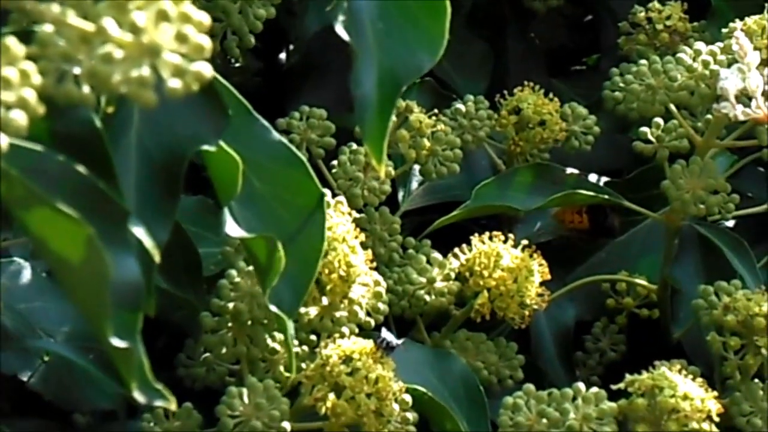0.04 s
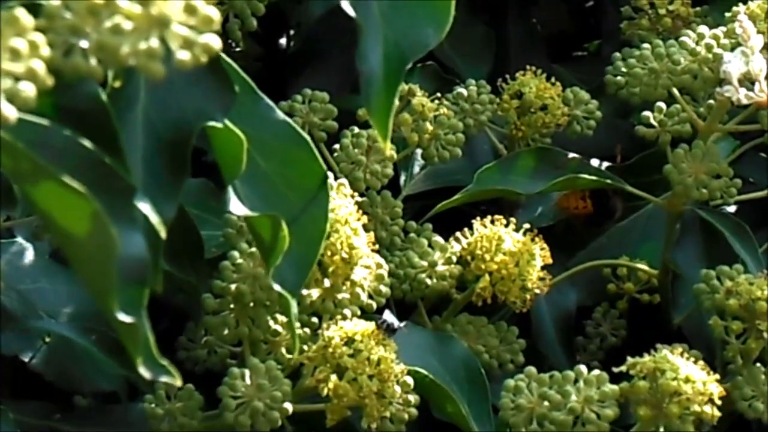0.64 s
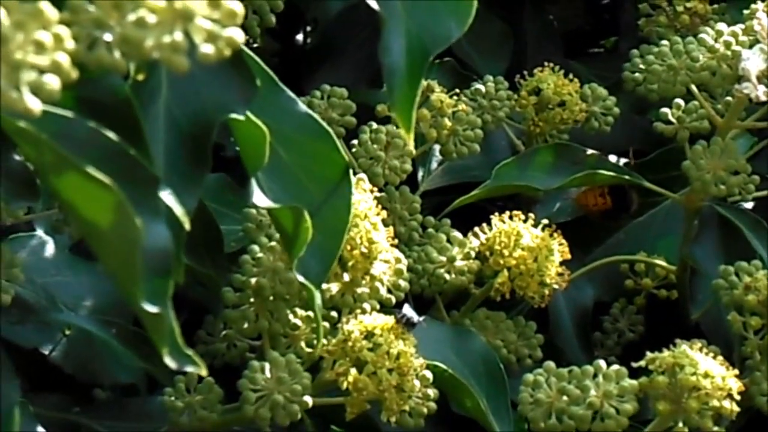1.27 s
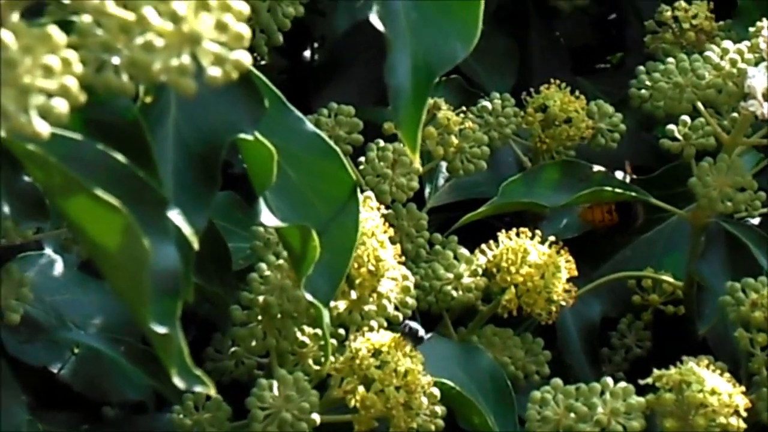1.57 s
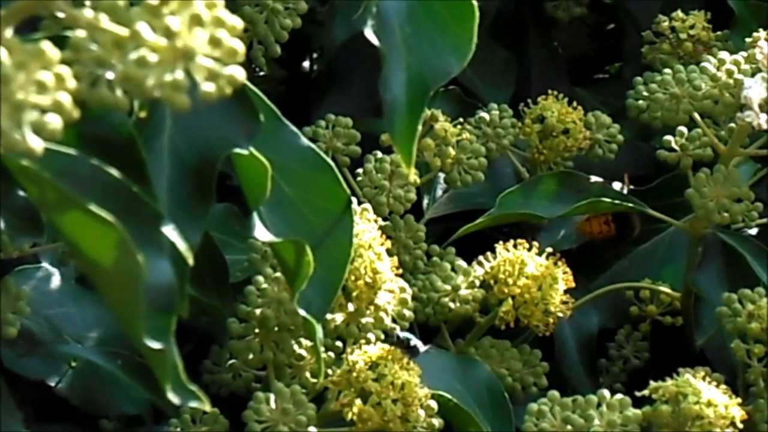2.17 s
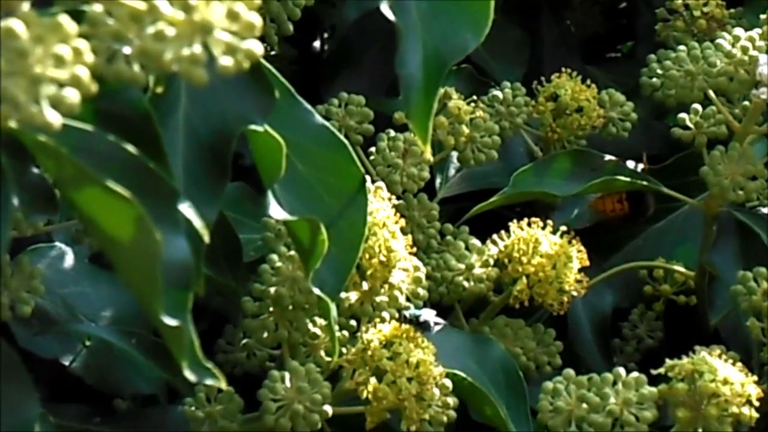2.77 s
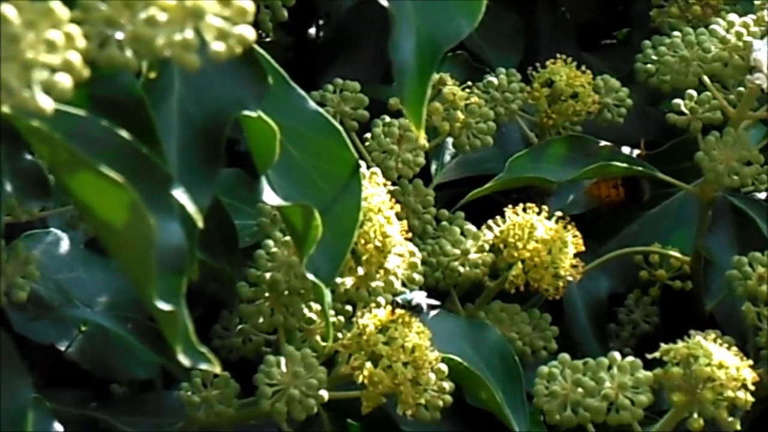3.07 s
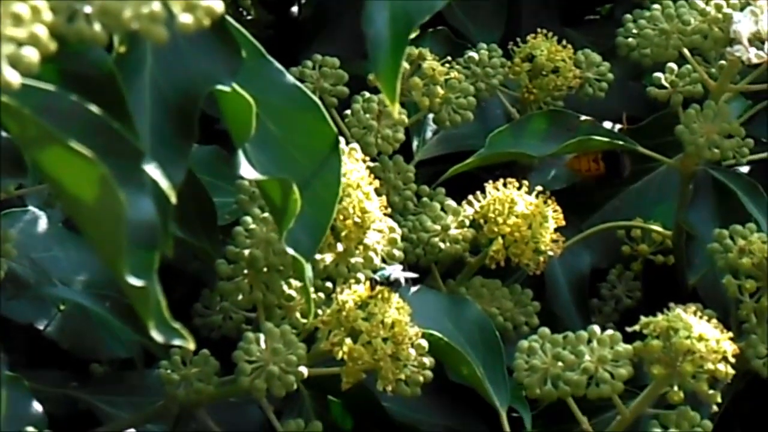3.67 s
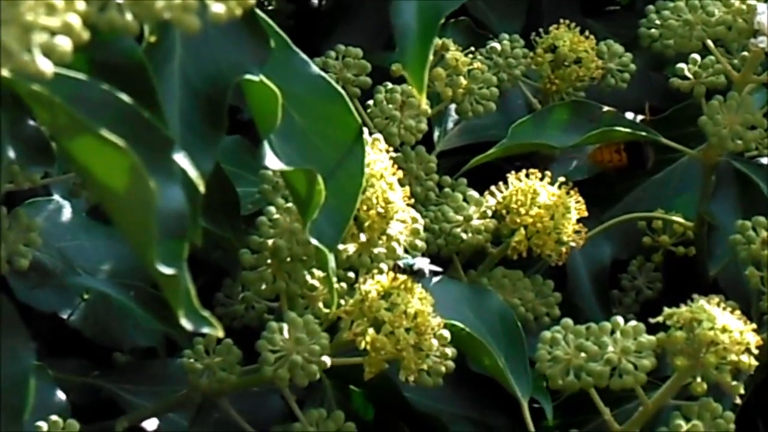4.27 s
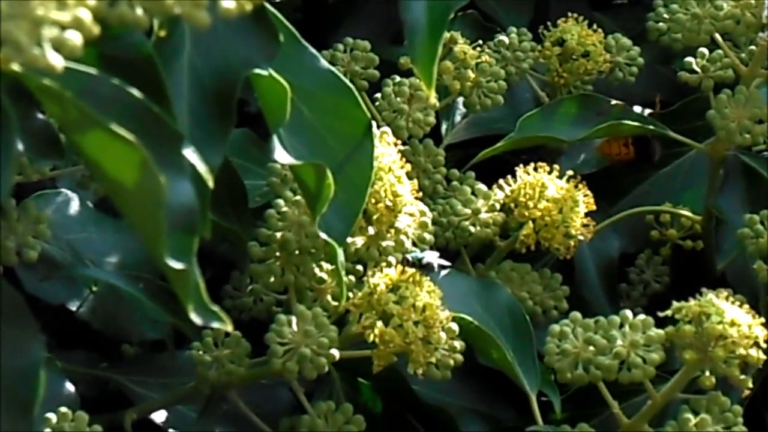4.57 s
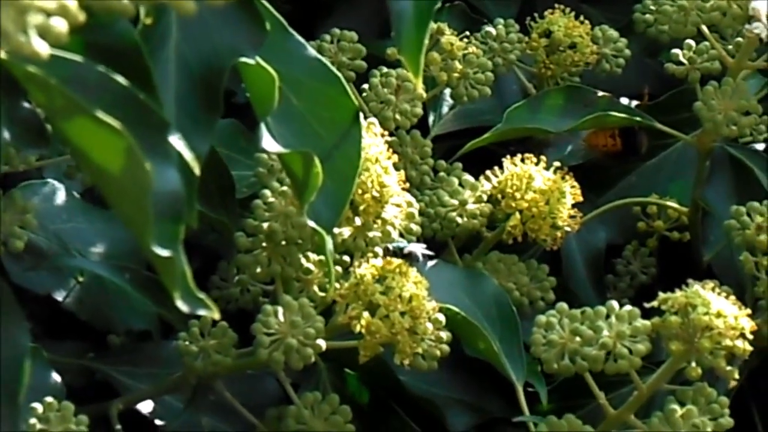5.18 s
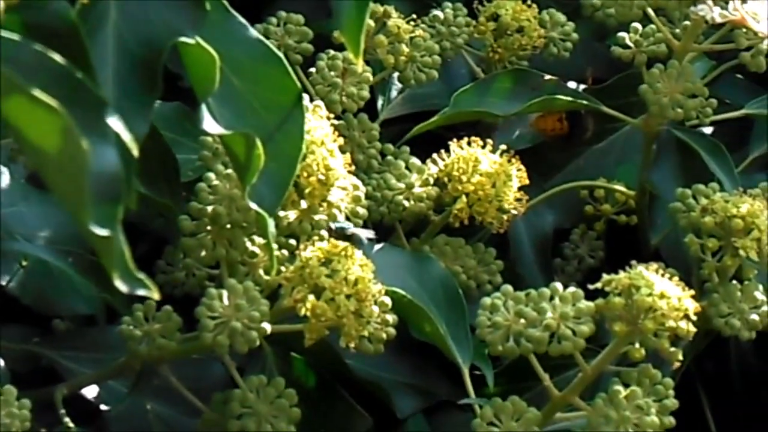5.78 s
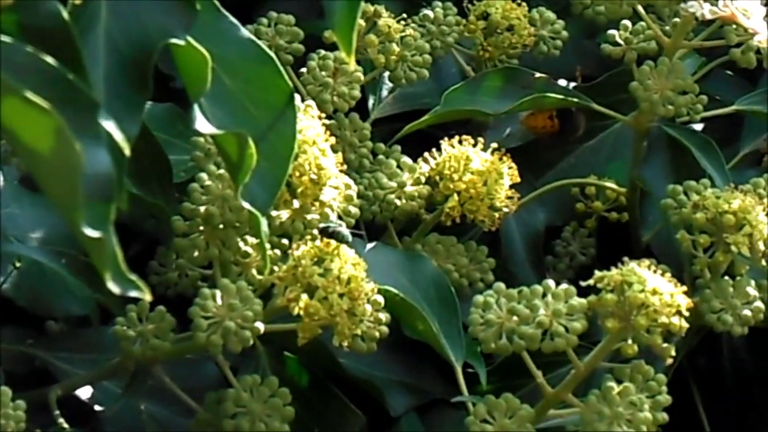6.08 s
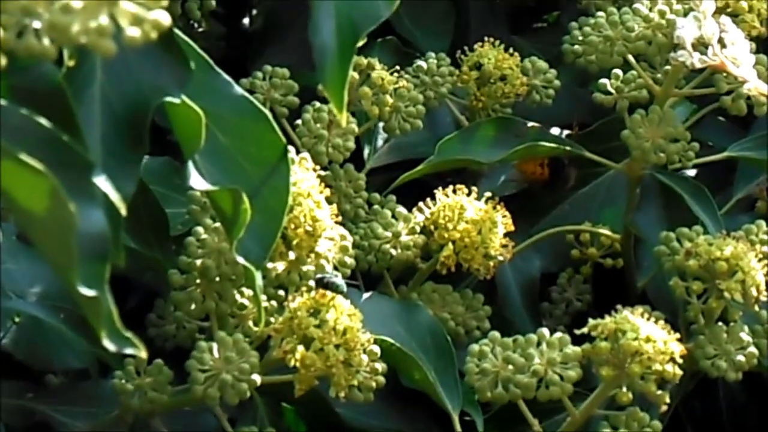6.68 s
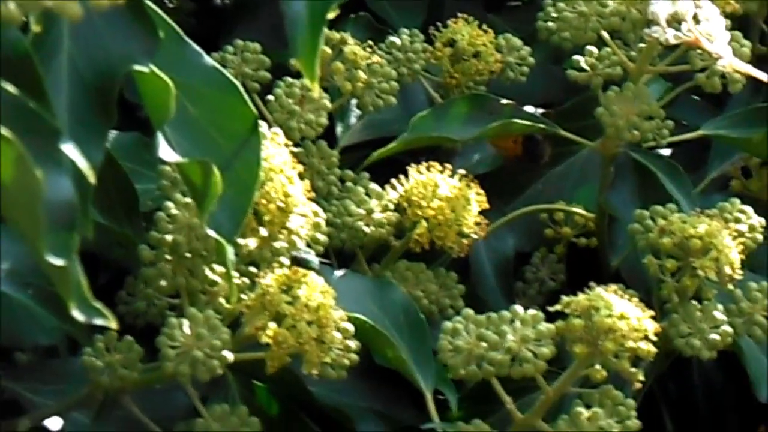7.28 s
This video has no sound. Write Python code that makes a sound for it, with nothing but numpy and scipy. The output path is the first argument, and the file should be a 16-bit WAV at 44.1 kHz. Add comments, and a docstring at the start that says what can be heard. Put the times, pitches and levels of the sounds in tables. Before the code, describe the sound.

A cicada-like insect rasps in fast, even chirps close by, over a throbbing insect chorus and faint wind on the microphone.

```python
"""Insects on a sunny ivy bank

Close to the microphone a cicada-like singer rasps about nine chirps a second, each a burst of tymbal
clicks scattered by the leaves. Further off a chorus throbs a little faster, in and out of step with it.
Bees hum faintly at the flowers, and a breeze buffets the hand-held microphone in the first seconds."""
import sys
import numpy as np
from scipy import signal
from scipy.fft import rfft, irfft
from scipy.io import wavfile
from scipy.ndimage import map_coordinates

SR = 44100
rng = np.random.default_rng(int(sys.argv[2]) if len(sys.argv) > 2 else 0)


def wrap_up_sound(samples):
    """Save the sound to the file named by the first command line argument, as 16-bit audio."""
    columns = np.atleast_2d(samples).T
    # keep every value between -1 and 1, then stretch to whole-number steps
    tamed = np.clip(columns, -1, 1)
    steps = np.round(tamed * 32767).astype(np.int16)
    wavfile.write(sys.argv[1], SR, steps)


N = 328103
TIME = np.arange(N) / SR
FREQ = np.maximum(np.arange(N // 2 + 1) * SR / N, 1)

# Narrow resonances of the song, near and far. Each row: centre in Hz, width in Hz, lift in dB.
SONG_RESONANCES = [(2210, 97, 4.5), (2520, 32, 3.5), (2708, 29, 5.5), (2925, 40, 4), (3946, 65, 5.5),
                   (4635, 67, 4), (4865, 25, 7.5), (5300, 33, 7), (5488, 23, 7), (5880, 110, 4.5)]


def near_singer():
    """Close by, each chirp is a burst of clicks that rings the abdomen and, higher up, the ribs."""
    # The singer drags and hurries. Each row: time in seconds, lag in seconds, effort in dB, rib bias in dB.
    delivery = [(0.0, 0.068, -35, -11), (0.45, 0.03, -35, -10.5), (0.8, 0.015, -32, -9.5),
                (1.25, -0.007, -33.5, -7), (1.55, 0.015, -33, -5.5), (2.0, 0.07, -36.5, -5.5),
                (2.5, 0.031, -34, -10.5), (2.75, 0.057, -34.5, -10.5), (3.35, 0.005, -35, -2),
                (3.7, 0.0038, -36, -9), (4.0, 0.016, -32.5, -4), (4.65, -0.012, -36, -6.5),
                (5.25, -0.017, -36, -5), (6.15, 0.018, -37, -4.5), (6.55, 0.071, -31.5, -8),
                (6.78, 0.097, -49.5, -18), (7.0, 0.045, -38, -11), (7.44, 0.09, -39, -6)]
    # Chirps that stand out, falter or linger.
    # Each row: time in seconds, extra body in dB, extra ribs in dB, length factor.
    accents = [(.26, 1.5, 4.5, 0.8), (.35, 4, 2, 0.73), (.45, 0.5, 3.5, 0.69), (.66, -2.5, -1.5, 1.3),
               (1.18, 0, -1, 1.35), (1.4, 1.5, -1, 1.05), (1.76, 0.5, 3.5, 1.13), (1.87, 1, 2, 1.5),
               (2.39, 3, 1, 0.98), (2.72, 0.5, 4.5, 1.9), (2.83, 3, 4, 1.16), (3.15, 2, -2.5, 1.12),
               (3.24, 3, -4, 1.37), (3.33, 2, -0.5, 0.95), (3.43, 1, 0, 1), (3.97, -1.5, 0.5, 1.32),
               (4.07, 0, -2, 1.13), (4.17, -6, -5, 2.2), (4.29, -0.5, -5, 0.86), (4.39, 1.5, 0.5, 0.85),
               (4.59, 0.5, 2, 0.9), (4.7, 0.5, 3.5, 1), (4.81, 0, 3.5, 0.89), (5.12, -1, -4.5, 1.13),
               (5.34, 2, -1, 1.05), (5.68, -2.5, -0.5, 0.92), (6.49, -2.5, -0.5, 1.06), (6.6, 0, 6, 1.1)]
    # The drum-like abdomen and the stiff tymbal ribs. Each row: frequency in Hz, relative level in dB.
    body_spectrum = [(400, -27), (950, -21.5), (1400, -9), (1950, -8), (2300, -3), (2750, 0), (3100, -2),
                     (3550, -3.5), (3800, -11), (4300, -12), (5500, -43.5)]
    rib_spectrum = [(3000, -21), (4000, -11.5), (4700, 0.5), (5300, 4.5), (5700, 0.5), (6400, 4),
                    (6900, -1), (7600, -10.5), (8600, -9), (9300, -16.5), (10100, -14), (11000, -56)]
    body_chirp_s, rib_chirp_s = 0.044, 0.038
    body_trim_db, rib_trim_db = -0.03, 1.1
    body_scatter_db, rib_scatter_db = 0.3, 0.6

    times = beats(delivery, period_s=0.107)
    at, _, effort_db, rib_bias_db = np.transpose(delivery)
    body_db = np.interp(times, at, effort_db) + body_scatter_db * np.interp(times, TIME, drift(7.3))
    ribs_db = body_db + np.interp(times, at, rib_bias_db)
    stretch = np.ones(len(times))
    for t, extra_body_db, extra_ribs_db, length_factor in accents:
        nearest = np.argmin(np.abs(times - t))
        body_db[nearest] += extra_body_db
        ribs_db[nearest] += extra_ribs_db
        stretch[nearest] = length_factor

    clicks = tymbal(click_hz=649.9, jitter=0.2, scatter_db=1.3)
    muscle_phase = wavering_phase(hz=105, spread=0.1125, rate_hz=29.8)
    clicks *= 1 + 0.18 * np.sin(muscle_phase)  # muscle strokes group the clicks
    body = colour(leaves(clicks, smear_s=0.0027, direct_db=-5), body_spectrum, SONG_RESONANCES)
    ribs = colour(leaves(clicks, smear_s=0.0027, direct_db=-6), rib_spectrum, SONG_RESONANCES)
    body *= swells(times, body_chirp_s * stretch, body_db + body_trim_db, rise=5.8, fall=2.02)
    ribs *= swells(times, rib_chirp_s * stretch, ribs_db + rib_trim_db, rise=3.6, fall=1.66)
    return body + gain(rib_scatter_db * drift(30)) * ribs


def tymbal(click_hz, jitter, scatter_db):
    """Ribs buckle one after another: a train of unevenly spaced, unevenly strong clicks."""
    cycles = np.cumsum(click_hz * np.exp(jitter * drift(click_hz))) / SR
    clicks = np.diff(np.floor(cycles), prepend=0)
    return unit_rms(clicks * gain(scatter_db * noise()))


def leaves(clicks, smear_s, direct_db):
    """Countless leaves throw each click back as a short diffuse tail."""
    energy = signal.lfilter([1], [1, -np.exp(-1 / (smear_s * SR))], clicks ** 2)
    tails = unit_rms(np.sqrt(energy) * noise())
    return unit_rms(gain(direct_db) * clicks + tails)


def beats(delivery, period_s):
    """Times of a singer's chirps: a steady beat, shifted by the singer's lag."""
    at, lag_s = np.transpose(delivery)[:2]
    count = (TIME - np.interp(TIME, at, lag_s)) / period_s
    whole = np.arange(np.floor(count[0]), np.ceil(count[-1]) + 1)
    return whole * period_s + np.interp(whole, count, TIME - count * period_s)


def far_chorus():
    """Singers further off overlap into a rasp that throbs loosely at its own pace."""
    # Their own beat. Each row: time in seconds, lag in seconds, effort in dB.
    delivery = [(0.0, 0.091, -40), (0.4, 0.029, -35), (0.8, 0.024, -36), (1.2, 0.033, -35),
                (1.7, 0.042, -35), (2.05, 0.083, -42.5), (2.5, 0.031, -35.8), (3.0, 0.042, -39.5),
                (3.4, 0.013, -33.5), (3.8, 0.016, -36.5), (4.2, 0.00086, -34.5), (4.5, 0.019, -42.5),
                (4.9, 0.048, -34.5), (5.3, 0.0095, -41.5), (5.7, 0.0044, -35.5), (6.0, 0.03, -40.5),
                (6.4, 0.034, -37.5), (6.9, -0.0091, -36.5), (7.44, 0.017, -39)]
    # Their tone at a distance. Each row: frequency in Hz, relative level in dB.
    spectrum = [(400, -27.5), (950, -17.5), (1400, -8), (2000, -4.5), (2650, 0.5), (3000, -0.5), (3400, -7),
                (3900, -15.5), (4400, -15), (5300, -11), (6400, -13), (7500, -19), (10000, -25),
                (11000, -41)]
    throb_s, throb_db, floor_db = 0.048, -1.07, -5.5
    clicks = tymbal(click_hz=451.2, jitter=0.35, scatter_db=2)
    rasp = colour(leaves(clicks, smear_s=0.006, direct_db=-12.5), spectrum, SONG_RESONANCES)
    times = beats(delivery, period_s=0.09804)
    throbs = swells(times, [throb_s] * len(times), [throb_db] * len(times), rise=2.15, fall=1.63)
    at, _, effort_db = np.transpose(delivery)
    loudness = gain(np.interp(TIME, at, effort_db) + 0.99 * drift(25))
    return rasp * loudness * np.hypot(throbs, gain(floor_db))


def reflections(direct):
    """Hard surfaces nearby comb the sound; the teeth drift as the hand-held microphone sways."""
    # One echo per surface. Each row: delay in seconds, level against the direct sound in dB.
    echoes = [(.0043, -17.5), (.0097, -10.5), (0.0162, -16)]
    sway_s = 0.000401
    out = direct
    for delay_s, db in echoes:
        position = (TIME - delay_s - sway_s * drift(0.752)) * SR
        out = out + gain(db) * map_coordinates(direct, [position], order=3)
    return out * np.std(direct) / np.std(out)


def shifting_colour(song):
    """The song leans up or down with the abdomen's tension; its hollow and hissy edges wax and wane."""
    # The hollow lower edge and the hiss between body and ribs. Each row: time in seconds, lift in dB.
    hollow_lift = [(0, -1.6), (1.7, -2), (2.05, -4), (2.3, 0), (3.7, -3), (5.4, -1.5), (6.1, -0.2),
                   (6.7, -2), (7.4, 0)]
    hiss_lift = [(0, 1), (.27, 7), (.6, 1), (1.5, 2.5), (2, -2), (3.5, .5), (4, -1.5), (4.6, 3), (5.2, -3),
                 (7.4, 0.5)]
    # Tension of the abdomen. Each row: time in seconds, upward lean in dB.
    tension = [(0, -0.5), (1.85, 0), (2.1, 3), (2.3, -0.5), (2.8, 0.5), (3.3, 0.5), (4, 0.5), (4.9, -.3),
               (6.6, -0.2), (7.4, -1.5)]
    lows = irfft(rfft(song) / (1 + (FREQ / 1900) ** 10), N)
    hollow = lows * (gain(curve(hollow_lift)) - 1)
    hiss = band(song, hz=4500, width_hz=510) * (gain(curve(hiss_lift)) - 1)
    lean = gain(curve(tension) + 1.13 * drift(12))
    upper = band(song, hz=3100, width_hz=390) * (lean - 1)
    lower = band(song, hz=2160, width_hz=390) * (1 / lean - 1)
    return song + hollow + hiss + upper + lower


def sinking_strains():
    """Now and then a narrow, rough resonance stands out of the chorus and slides down."""
    # Each row: middle in seconds, length in seconds, pitch in Hz, glide in Hz per second, level in dB.
    strains = [(.49, 0.13, 2695, -400, -38), (2.661, 0.16, 2600, -100, -45), (4.3, 0.063, 2700, -2000, -43),
               (4.88, .19, 2593, -1700, -42.5)]
    roughness = drift(70) + 1j * drift(59)
    out = np.zeros(N)
    for t, length, hz, glide, db in strains:
        phase = 2 * np.pi * np.cumsum(hz + glide * (TIME - t)) / SR
        out += unit_rms((roughness * np.exp(1j * phase)).real) * swells([t], [length], [db])
    return out


def bees():
    """Bees flit between the flowers: a wavering wingbeat with its harmonics."""
    # Short flights. Each row: middle in seconds, length in seconds, wingbeat in Hz, level in dB.
    flights = [(4.95, .45, 239.3, -69), (6.524, 0.056, 164, -60), (6.75, 0.026, 161, -58.5)]
    # The wing's tone. Each row: harmonic number, relative level in dB.
    harmonics = [(1, 1), (2, -9), (3, -3), (4, -1), (5, -3), (6, -16)]
    out = np.zeros(N)
    for t, length, hz, db in flights:
        phase = wavering_phase(hz, spread=0.0323, rate_hz=39)
        buzz = sum(gain(harmonic_db) * np.sin(k * phase) for k, harmonic_db in harmonics)
        out += unit_rms(buzz) * swells([t], [length], [db])
    return out


def breeze():
    """Eddies rumble on the microphone and swell in gusts; the sharper ones push it for about a cycle."""
    # The steady breeze. Each row: time in seconds, level in dB.
    strength = [(0, -71), (.5, -64.5), (3.2, -65), (3.6, -69), (6.3, -72), (6.8, -70), (7.44, -65)]
    # Gusts. Each row: start in seconds, length in seconds, level in dB.
    gusts = [(0.112, 0.083, -57), (0.24, .07, -57), (0.365, .15, -55), (0.844, 0.18, -53.5),
             (1.138, 0.1, -52.5), (1.48, 0.04, -48), (1.64, 0.15, -52.5), (1.852, 0.081, -52),
             (2.58, 0.066, -56), (2.9, 0.096, -60), (3.03, .04, -59)]
    # The rumble. Each row: frequency in Hz, relative level in dB.
    spectrum = [(15, 5), (35, 7), (55, -4.5), (90, -2.5), (150, -44), (300, -22), (700, -68)]
    # Soft bumps of air. Each row: middle in seconds, length in seconds, frequency in Hz, level in dB.
    buffets = [(0.406, 0.0045, 118, -40.5), (0.474, 0.0059, 116, -47), (.507, .012, 80, -61),
               (1.188, 0.0052, 105, -46), (1.511, 0.023, 50, -52), (3.055, 0.016, 65, -54)]
    starts, lengths, gust_db = np.transpose(gusts)
    gusting = swells(starts + lengths / 2, lengths, gust_db, rise=4, fall=4.4)
    out = colour(noise(), spectrum) * np.hypot(gain(curve(strength)), gusting)
    for t, length, hz, db in buffets:
        out += unit_rms(np.sin(2 * np.pi * hz * (TIME - t))) * swells([t], [length], [db])
    return out


def stirrings():
    """Small sounds near the microphone: a tiny high tick, a soft hollow knock and a brief low rustle."""
    # The knock's modes. Each row: frequency in Hz, level in dB, seconds to fade by 60 dB.
    knock_modes = [(342, -59, 0.88), (426, -58, 0.26), (524, -61, 0.29)]
    # The tick and the rustle. Each row: middle in seconds, length in seconds, level in dB.
    ticks = [(3.094, 0.0025, -49)]
    rustles = [(6.553, 0.088, -54.5)]
    # The rustle's tone. Each row: frequency in Hz, relative level in dB.
    rustle_spectrum = [(50, -5), (110, -3), (200, -3), (400, -8), (750, -6), (1500, -14)]
    knock_start_s = 5.945
    age = np.maximum(TIME - knock_start_s, 0)
    knock = sum(gain(db - 60 * age / t60) * np.sin(2 * np.pi * hz * age) for hz, db, t60 in knock_modes)
    tick = unit_rms(band(noise(), hz=9800, width_hz=890)) * swells(*np.transpose(ticks))
    rustle = colour(noise(), rustle_spectrum) * swells(*np.transpose(rustles))
    return tick + knock + rustle


def garden_air():
    """Soft outdoor air all round the bank, with a few faint hums that waver in pitch and level."""
    # The hums. Each row: pitch in Hz, mean level in dB.
    hums = [(341, -79), (539, -73), (761, -89)]
    # The air. Each row: frequency in Hz, relative level in dB.
    spectrum = [(20, -3), (100, -0.5), (240, -5), (450, -2.5), (800, -0.5), (1500, -0.5), (4000, -9),
                (11000, -29.5)]
    air_db = -57.5
    out = np.zeros(N)
    for hz, db in hums:
        loudness = gain(db + 2 * drift(5.9))
        out += loudness * unit_rms(np.sin(wavering_phase(hz, spread=0.01805, rate_hz=19.6)))
    return out + colour(noise(), spectrum) * gain(air_db + 2.4 * drift(9.2))


def gain(db):
    """Decibels to amplitude."""
    return 10 ** (np.asarray(db) / 20)


def unit_rms(x):
    """Scale to rms 1."""
    return x / np.sqrt(np.mean(x ** 2))


def curve(rows):
    """Join rows of time in seconds and value by straight lines."""
    return np.interp(TIME, *np.transpose(rows))


def noise():
    """White noise."""
    return rng.standard_normal(N)


def drift(rate_hz):
    """Smooth random motion of rms 1 that changes about rate_hz times a second."""
    return unit_rms(irfft(rfft(noise()) * np.exp(-(FREQ / rate_hz) ** 2), N))


def wavering_phase(hz, spread, rate_hz):
    """Phase of a tone whose pitch wanders about hz by the fraction spread."""
    return 2 * np.pi * np.cumsum(hz * (1 + spread * drift(rate_hz))) / SR


def band(x, hz, width_hz):
    """The part of x in a bell-shaped band."""
    return irfft(rfft(x) * np.exp(-((FREQ - hz) / width_hz) ** 2), N)


def colour(x, spectrum, resonances=()):
    """Pass x through a broad spectrum with narrow resonances on top; rms 1."""
    hz, db = np.transpose(spectrum)
    gain_db = np.interp(np.log(FREQ), np.log(hz), db)
    for centre, width, lift in resonances:
        gain_db += lift / (1 + (2 * (FREQ - centre) / width) ** 2)
    skirts = 1 / (1 + (hz[0] / 2 / FREQ) ** 2) / (1 + (FREQ / hz[-1] / 2) ** 2)
    return unit_rms(irfft(rfft(x) * gain(gain_db) * skirts, N))


def swells(times, lengths, levels_db, rise=2, fall=2):
    """Envelope of rounded bursts, lengths taken at half power; a higher rise or fall squares that flank."""
    power = np.zeros(N)
    for t, length, db in zip(times, lengths, levels_db):
        near = slice(*np.searchsorted(TIME, [t - 2 * length, t + 2 * length]))
        offset = 2 * (TIME[near] - t) / length
        squareness = np.where(offset < 0, rise, fall)
        power[near] += gain(db) ** 2 * 0.5 ** (np.abs(offset) ** squareness)
    return np.sqrt(power)


def scene():
    """The whole bank at one microphone."""
    song = shifting_colour(reflections(near_singer() + far_chorus()))
    return (song + sinking_strains() + bees() + garden_air() + breeze() + stirrings())[None]


def record(dry):
    """A steep low-pass after the microphone cuts the top of the treble."""
    top_hz = 10700
    return signal.sosfilt(signal.ellip(8, 0.2, 70, top_hz, fs=SR, output="sos"), dry)


dry = scene()
out = record(dry)
wrap_up_sound(out)
```